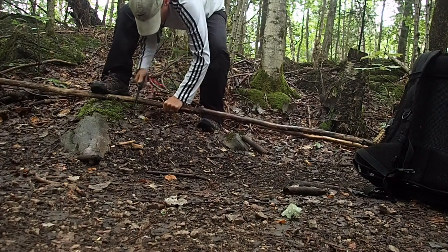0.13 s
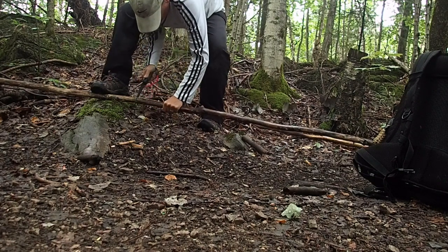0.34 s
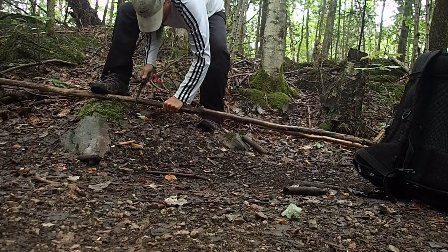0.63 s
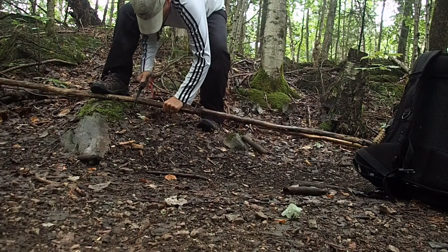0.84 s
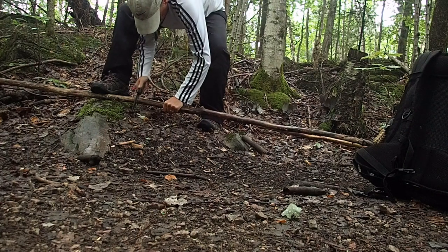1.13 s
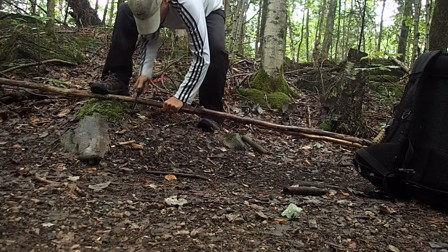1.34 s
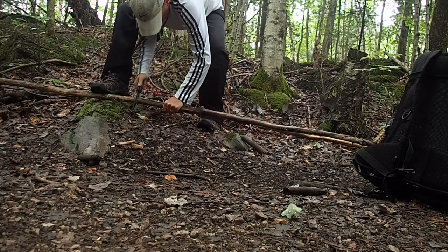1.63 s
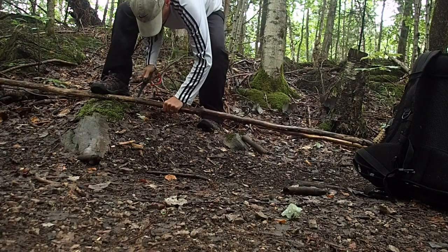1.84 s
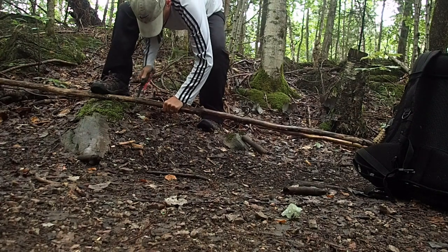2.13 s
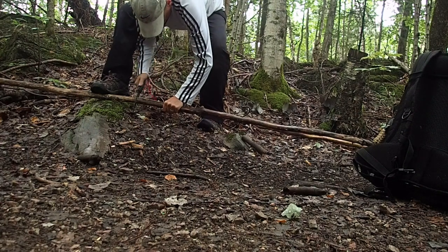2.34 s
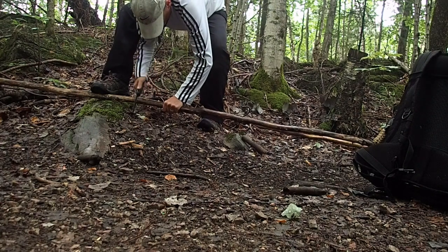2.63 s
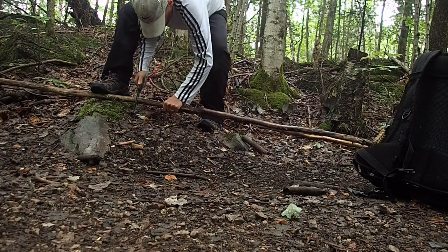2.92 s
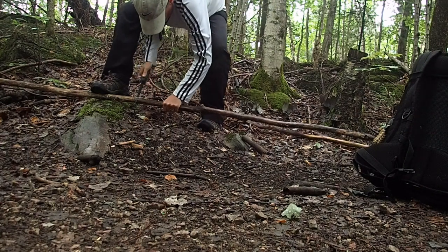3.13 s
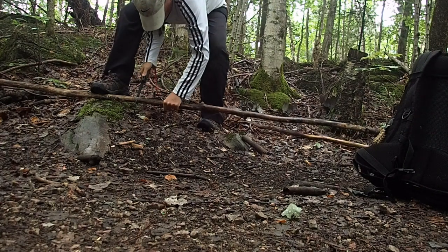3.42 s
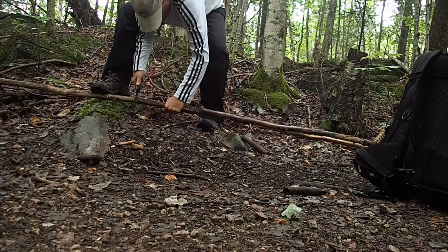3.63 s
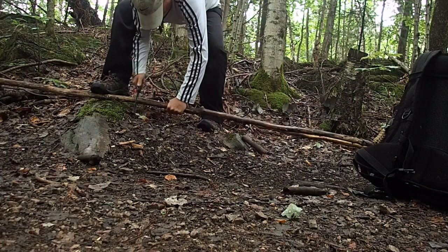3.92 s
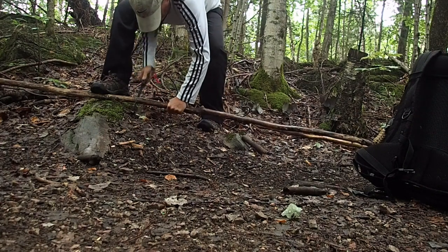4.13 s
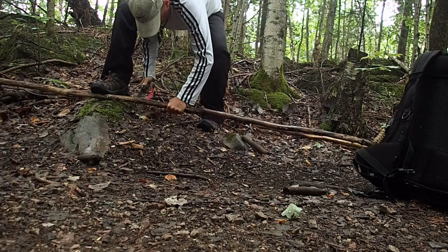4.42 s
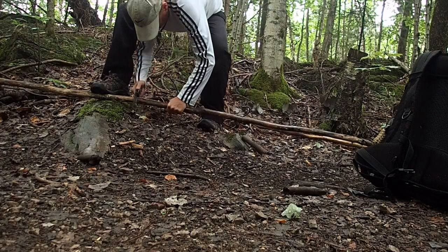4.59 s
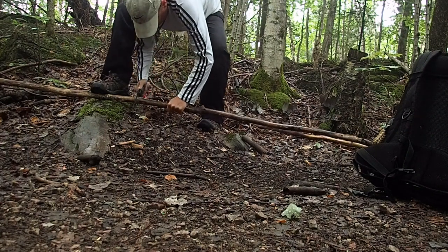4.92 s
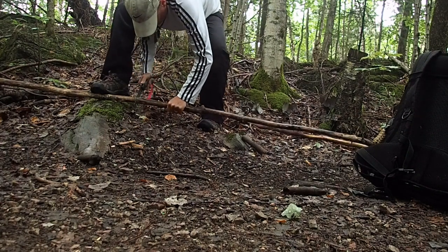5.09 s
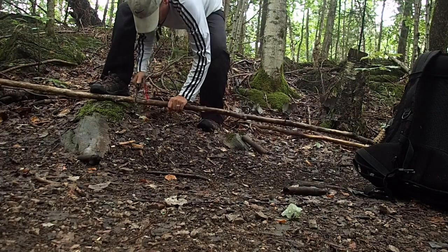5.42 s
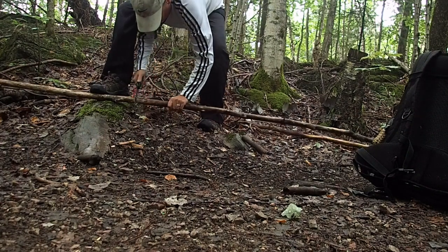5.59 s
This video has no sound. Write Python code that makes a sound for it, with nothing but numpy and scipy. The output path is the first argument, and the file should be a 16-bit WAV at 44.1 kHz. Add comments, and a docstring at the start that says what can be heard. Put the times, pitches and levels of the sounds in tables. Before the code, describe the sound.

A hand saw cuts through a branch close by on a forest floor, slightly to the right. From the start it moves back and forth at about six strokes a second, each a bright rasp over a hollow wooden boom. The blade squeaks thinly at about 0.2 seconds and snags on snapping splinters near 0.6 and 1.2 seconds. The wood groans briefly around 0.9 seconds and several times between 2.3 and 2.8. The saw rests from about 3.2 to 3.55 seconds, then resumes with sharper splinter snaps and a few dull knocks. Small cracks come at 4.3 and 4.9 seconds, and at 5.2 the branch breaks through with a loud, sharp crack and the sawing stops. A faint groan and small knock follow near 5.7 seconds. The trees return a short, light echo, over faint air and a steady high hiss.

```python
"""A hand saw works through a branch, close by on a forest floor, nearer the right of two microphones.
At about six strokes a second, with one rest, its teeth knock the branch and tear fibres.
The blade squeaks and snags on splinters; the wood groans, knocks and at last cracks right through.
The ground and the trunks scatter the sound back over faint air and a steady high background hiss."""
import sys
import numpy as np
from scipy import signal
from scipy.fft import rfft, irfft, next_fast_len
from scipy.io import wavfile
from scipy.ndimage import map_coordinates

SR = 44100
rng = np.random.default_rng(int(sys.argv[2]) if len(sys.argv) > 2 else 0)


def master(y):
    """Save y as 16-bit WAV."""
    cut = np.clip(np.atleast_2d(y).T, -1, 1)
    pcm = np.round(cut * 32767)  # scale
    wavfile.write(sys.argv[1], SR, pcm.astype(np.int16))


N = 253560
TIME = np.arange(N) / SR


def amp(db):
    """Decibels to gain."""
    return 10 ** (np.asarray(db) / 20)


def unit(x):
    """Scale to rms 1."""
    return x / np.sqrt(np.mean(x ** 2) + 1e-20)


def along(points, hz):
    """Read (f/Hz, value) points on a log axis."""
    f, v = np.transpose(points)
    return np.interp(np.log(hz + 1), np.log(f), v)


def filtered(x, response):
    """Multiply x by a complex response of frequency."""
    size = next_fast_len(N + SR // 2)
    return irfft(rfft(x, size) * response(np.fft.rfftfreq(size, 1 / SR)), size)[..., :N]


def ring(x, colour, size=4096):
    """Pass x through a causal body of the given colour and unit energy."""
    cepstrum = irfft(np.log(amp(along(colour, np.fft.rfftfreq(size, 1 / SR))) + 1e-6))
    cepstrum[1:size // 2] *= 2  # fold to minimum phase
    cepstrum[size // 2 + 1:] = 0
    response = irfft(np.exp(rfft(cepstrum)))
    return signal.fftconvolve(x, response / np.linalg.norm(response))[:N]


def wobble(rate):
    """A smooth random curve with rate knots a second."""
    return map_coordinates(rng.standard_normal(int(N * rate / SR) + 4), [TIME * rate])


def sliding(x, colour, shift, rate=12):
    """A body whose resonances drift up and down by the share shift as the teeth move through the cut."""
    low, high = (ring(x, [(hz * (1 + side * shift), db) for hz, db in colour]) for side in (-1, 1))
    place = (1 + np.tanh(2 * wobble(rate))) / 2
    return (1 - place) * low + place * high


def fibres(rate, spread_db):
    """Tiny random fractures of uneven size, about rate a second, rms 1."""
    clicks = (rng.random(N) < rate / SR) * rng.choice([-1, 1], N)
    return unit(clicks * amp(spread_db * rng.standard_normal(N)))


def blow(start, t60, attack):
    """An envelope that rises at start and dies away; times in seconds."""
    first, last = np.searchsorted(TIME, [start, start + 2 * t60])
    age, envelope = TIME[first:last] - start, np.zeros(N)
    envelope[first:last] = (1 - np.exp(-age / attack)) * amp(-60 * age / t60)
    return envelope


def slip(start, length, first_hz, last_hz, db, overtone):
    """A brief gliding friction tone that swells and fades."""
    span, tone = (TIME > start) & (TIME < start + length), np.zeros(N)
    age = TIME[span] - start
    phase = 2 * np.pi * (first_hz * age + (last_hz - first_hz) * age ** 2 / (2 * length) + rng.random())
    tone[span] = amp(db) * np.sin(np.pi * age / length) * (np.sin(phase) + overtone * np.sin(2 * phase))
    return tone


# how alike the background is at the two microphones: f/Hz, correlation
COHERENCE = [(60, 0.4), (180, 0.12), (550, 0.17), (1650, 0.3), (4970, 0.5), (15000, 0.03)]
def hush(colour, db, sway_db, pan_db):
    """A steady, gently swaying rush in both microphones."""
    def mid_and_side(hz):
        turn = np.arccos(along(COHERENCE, hz)) / 2
        return amp(along(colour, hz)) * [np.cos(turn), np.sin(turn)]
    mid, side = filtered(rng.standard_normal((2, N)), mid_and_side)
    level = amp(db + sway_db * wobble(9)) * amp([[pan_db / 2], [-pan_db / 2]])
    return unit(np.array([mid + side, mid - side])) * level


# spectra of the forest air and of the background hiss: f/Hz, relative level/dB
AIR_COLOUR = [(15, -47), (25, -21.5), (149, -4.5), (176, -4), (205, -9.5), (300, -1.5), (412, -7),
              (459, -7.5), (489, -8), (672, -6.5), (732, -4.5), (1470, -11), (1820, -18), (1980, -15),
              (4000, -22.5), (5200, -58), (8800, -120)]
HISS_COLOUR = [(2240, -43), (3800, -33), (4130, -8.5), (4550, -1), (5420, 6.5), (6000, -0.5), (8010, 3.5),
               (9200, -4), (12700, -5), (14600, -6), (16000, -4)]
def air_and_hiss():
    """The bed: a low rush of air and a steady high background hiss, a little to the right."""
    air = hush(AIR_COLOUR, db=-54, sway_db=1.4, pan_db=-3)
    hiss = hush(HISS_COLOUR, db=-52, sway_db=0.6, pan_db=-2.5)
    return air + hiss


# push and pull in turn: start t/s, fastest t/s, end t/s, force level/dB, early drag re force/dB
SAW_STROKES = [(.115, .134, 0.26, -41, -27), (.246, 0.331, .39, -33, -16.5), (.402, .471, 0.55, -31.5, -10),
               (.551, .631, .7, -33, -5.5), (.71, .764, .82, -34.5, -14), (.873, .932, .99, -32, -16),
               (1.008, 1.073, 1.127, -34, -8.5), (1.091, 1.131, 1.176, -38, -12),
               (1.169, 1.247, 1.332, -34.5, 1), (1.322, 1.399, 1.429, -32, -7.5),
               (1.438, 1.537, 1.59, -33.5, -11.5), (1.599, 1.661, 1.749, -32, -21),
               (1.737, 1.833, 1.89, -33, -37), (1.914, 1.967, 2.076, -34, -20),
               (2.065, 2.176, 2.223, -33, -6), (2.245, 2.314, 2.368, -32, -16),
               (2.407, 2.479, 2.52, -33, -11.5), (2.574, 2.631, 2.706, -33, -9),
               (2.717, 2.813, 2.853, -32.5, -9.5), (2.9, 2.95, 3.045, -36, -29),
               (3.024, 3.127, 3.192, -35, -30), (3.556, 3.631, 3.7, -33, -17),
               (3.689, 3.805, 3.872, -33.5, -10), (3.883, 3.958, 3.99, -35, -9),
               (3.992, 4.097, 4.147, -32, -19), (4.165, 4.245, 4.285, -33, -10.5),
               (4.308, 4.408, 4.43, -34.5, -36), (4.564, 4.633, 4.67, -36.5, -5),
               (4.703, 4.778, 4.845, -31.5, -18), (4.847, 4.895, 4.93, -40, -22),
               (5, 5.076, 5.16, -33.5, -18)]
def arm(branch_power, wood_power, rasp_power, full_speed_hz=299.7, pace_spread=.18, catch_s=.011):
    """The arm's force and the blade's speed set the tooth rate and the drive of three saw layers."""
    tooth_hz, drive = np.zeros(N), np.zeros((3, N))
    powers = np.array([[branch_power], [wood_power], [rasp_power]])
    for start, fastest, end, force_db, drag_db in SAW_STROKES:
        span = (TIME > start) & (TIME < end)
        t = TIME[span]
        speed = np.abs(np.sin(np.pi * np.interp(t, [start, fastest, end], [0, .5, 1])))
        # the teeth catch at once and drag while the arm gathers speed
        caught = np.clip((t - start) / catch_s, 0, 1) * (t < fastest)
        drag = (amp(drag_db) * caught) ** (powers / wood_power)
        peak_hz = full_speed_hz * (1 + pace_spread * rng.uniform(-1, 1))
        tooth_hz[span] = np.maximum(tooth_hz[span], peak_hz * speed ** .4)
        drive[:, span] += amp(force_db) * (drag + (1 - drag) * speed ** powers)
    return tooth_hz, drive


# spectra of the booming branch, the wood at the cut and the blade's rasp: f/Hz, relative level/dB
BRANCH_COLOUR = [(32, -70), (55, -21), (108, -10), (167, -10), (260, -1.5), (352, 2), (456, -7.5),
                 (500, -18), (650, -39), (1100, -120)]
WOOD_COLOUR = [(260, -48.5), (450, -21), (555, -4), (711, 1), (970, -1.5), (1310, -8), (1500, -17.5),
               (1660, -7), (1860, -31), (2070, -16.5), (2530, -27.5), (3040, -15), (3330, -25), (3680, -19),
               (4000, -45), (5200, -50), (8800, -120)]
RASP_COLOUR = [(2240, -29), (3800, -17), (4060, -18), (4500, -4), (4830, -8), (6190, 0.5), (6890, -4),
               (7870, 1), (8510, -3.5), (9370, -10.5), (11100, -13.5), (15200, -14), (16000, -14)]
# the branch booms more as the cut deepens: t/s, relative level/dB
BRANCH_BOOM = [(.3, -8), (1.3, -5.5), (2.35, -3), (3.1, -3.5), (3.85, -5.5), (4.7, -1.5), (5.1, -3.5)]
def saw(jitter=.09, tooth_share=0.4, bite=0.28, grab_db=0.91, catch_db=2.0):
    """Close to the microphones, each tooth shoves the branch and tears a clump of fibres."""
    tooth_hz, (branch, wood, rasp) = arm(branch_power=3.13, wood_power=3.33, rasp_power=2.72)
    teeth_passed = np.cumsum(tooth_hz * (1 + jitter * wobble(170))) / SR
    teeth = unit(np.diff(np.floor(teeth_passed), prepend=0) * amp(3.7 * rng.standard_normal(N)))
    tearing = unit(1 + bite * np.cos(2 * np.pi * teeth_passed))
    grab = amp(grab_db * wobble(90))  # the teeth grip unevenly along the grain
    shove = tooth_share * teeth + (1 - tooth_share) * fibres(1500, spread_db=2.5)
    chips = 0.24 * teeth + tearing * fibres(3000, spread_db=2.5)
    dust = tearing * fibres(12000, spread_db=3.5) * amp(catch_db * wobble(130))
    boom = amp(np.interp(TIME, *np.transpose(BRANCH_BOOM)))
    return (ring(grab * branch * boom * shove * amp(-2), BRANCH_COLOUR)
            + sliding(grab * wood * chips * amp(-2.5), WOOD_COLOUR, shift=0.014)
            + sliding(grab * rasp * dust * amp(-3.3), RASP_COLOUR, shift=0.02))


# the blade snags: t/s, length/s, force level/dB, knock re force/dB
BLADE_SNAGS = [(.1345, .005, -24, -11), (.1815, .005, -26, -19), (0.576, .005, -19, -7),
               (1.0291, .005, -28, -7), (1.176, .005, -22, -14), (1.1856, .005, -19, -11),
               (1.193, .005, -15.5, -11), (1.5146, .005, -22.5, -5), (1.937, .025, -27, -9),
               (3.5639, .005, -36, 3), (3.598, .005, -27, 13), (3.6313, .005, -11.5, -16),
               (3.731, .005, -12.5, -17), (3.7507, .032, -14, -20), (3.952, .005, -20.5, -1),
               (3.9934, .005, -23.5, -18), (4.2956, .005, -26, -25), (4.5, .005, -26, -22),
               (4.5143, .005, -21, -7), (4.6277, .005, -19, -8), (4.6345, .005, -20, -10),
               (4.6398, .005, -14.5, -3), (4.732, .005, -26, -5), (4.7593, .015, -12, -15),
               (4.782, .015, -13.5, -17), (4.9576, .005, -27, -28)]
def splinters(gap_s=0.00935, stray_db=2, spread_db=2.5, stray_knock_db=-9):
    """Rows (t/s, level/dB, knock/dB): a run at each snag, and a stray as each stroke gathers speed."""
    rows = [(at, db, knock_db) for start, length, db, knock_db in BLADE_SNAGS
            for at in np.arange(start, start + length, gap_s)]
    delays, sizes = rng.random(len(SAW_STROKES)), rng.standard_normal(len(SAW_STROKES))
    for (start, fastest, _, force_db, _), delay, size in zip(SAW_STROKES, delays, sizes):
        at = start + delay * (fastest - start)
        rows.append((at, force_db + stray_db + spread_db * size, stray_knock_db))
    return rows


# spectrum of a snapping splinter: f/Hz, relative level/dB
SPLINTER_COLOUR = [(1500, -15), (3000, -15.5), (4000, -13), (5100, -8.5), (6300, 5.5), (7100, -3),
                   (8000, 4.5), (10000, -12), (15500, -21)]
def snags(snap_db=-7, knock_db=-11):
    """Splinters snap in a quick run of fractures that also knocks the wood."""
    snap, knock = np.zeros((2, N))
    for start, db, wood_db in splinters():
        force = amp(db) * blow(start, t60=.025, attack=0.00085)
        snap += force
        knock += force * amp(wood_db)
    return (ring(amp(snap_db) * snap * fibres(18000, spread_db=1), SPLINTER_COLOUR)
            + ring(amp(knock_db) * knock * fibres(8000, spread_db=2), WOOD_COLOUR))


# squeaks of the blade: t/s, length/s, f/Hz, level/dB
BLADE_SQUEAKS = [(.215, 0.009, 4370, -45), (.23, 0.011, 4440, -44), (.23, 0.0097, 11400, -42),
                 (.23, .012, 14879, -51), (2.396, .016, 9085, -48)]
def squeaks():
    """The steel rubs in the kerf with thin, pure tones."""
    return sum(slip(start, length, hz, hz, db, overtone=0) for start, length, hz, db in BLADE_SQUEAKS)


# the branch gives way, at last right through: t/s, level/dB, bright snap re level/dB
BRANCH_CRACKS = [(0.85, -39, -10), (4.2644, -28.5, 9), (4.9271, -23, 6.5), (5.1906, -11, 1),
                 (5.221, -26, -3)]
# modes of the breaking branch: f/Hz, relative level/dB, t60/s
FRACTURE_MODES = [(900.6, -12, 0.017), (1306, -10.5, 0.017), (2253, -16.5, 0.013), (3009, -9, 0.017),
                  (3724, -15, 0.017), (4480, -6.5, 0.011), (5100, 0.5, 0.014), (6150, 1, 0.011),
                  (7193, -6, 0.013), (8190, 6.5, 0.0074), (8900, 0.5, 0.0052), (10240, -9, .008),
                  (12500, -5, .007), (14800, -4, .005)]
def cracks(tear_db=-6, rustle_db=-30):
    """Fibres give way at once: a bright snap, a short ring, a little tearing and a splintery rustle."""
    ringing, snap, tear = np.zeros((3, N))
    t = np.arange(SR // 20) / SR
    onset = 1 - np.exp(-t / 0.00023)
    for start, db, bright_db in BRANCH_CRACKS:
        modes = sum(amp(level - 60 * t / t60) * np.sin(2 * np.pi * (hz * t + rng.random()))
                    for hz, level, t60 in FRACTURE_MODES)
        ringing[round(start * SR):][:len(t)] += amp(db - 0.7) * modes * onset
        snap += amp(db + bright_db) * blow(start, t60=0.009, attack=0.00038)
        tear += amp(db + tear_db) * blow(start, t60=0.018, attack=0.00081)
        tear += amp(db + rustle_db) * blow(start, t60=0.41, attack=.02)
    bright = ring(snap * rng.standard_normal(N), [(3000, -15), (8000, 5), (11000, -0.5), (15500, -1.5)])
    return ringing + bright + ring(tear * fibres(12000, spread_db=0), SPLINTER_COLOUR)


# groans of the branch: t/s, length/s, first f/Hz, last f/Hz, level/dB
BRANCH_GROANS = [(.905, .051, 328, 259, -35.5), (2.288, .063, 240.1, 261, -35.5),
                 (2.45, 0.052, 272.5, 278, -35.5), (2.608, .04, 225, 275, -34.5),
                 (2.635, .041, 315, 354, -30.5), (2.781, 0.061, 284.5, 306.6, -37),
                 (4.742, 0.039, 297, 299.4, -36), (5.658, .027, 453, 312, -40.5)]
def groans():
    """Stick and slip in the cut makes the wood groan."""
    return sum(slip(*row, overtone=0.22) for row in BRANCH_GROANS)


# the branch knocks in the cut: t/s, relative level/dB, f/Hz, t60/s
BRANCH_KNOCKS = [(3.636, -30.5, 1155, 0.042), (3.956, -33.5, 1201, 0.051), (4.265, -32.5, 1060, 0.023),
                 (5.229, -42, 260.1, .08), (5.7267, -33, 1070, 0.016), (5.733, -48, 294, 0.058)]
def knocks(rattle_db=-4):
    """Each dull knock is one damped resonance and a dry rattle of the wood."""
    tone, force = np.zeros((2, N))
    for start, db, hz, t60 in BRANCH_KNOCKS:
        hit = 2 * amp(db) * blow(start, t60, attack=0.001)
        tone += hit * np.sin(2 * np.pi * hz * (TIME - start))
        force += hit
    return tone + ring(amp(rattle_db) * force * fibres(4600, spread_db=5.0), WOOD_COLOUR)


# left microphone minus right: f/Hz, level/dB
LEFT_LEVEL = [(60, 0), (110, -11), (200, -14.5), (380, -8.5), (700, -2), (1290, -4.5), (2380, -4),
              (4400, -3.5), (8120, -6), (15000, 0.5)]
# left microphone ahead of right: f/Hz, phase/rad
LEFT_LEAD = [(0, 0), (430, 1.32), (690, -0.48), (1380, 0.53), (1640, 0.035), (4310, 0.44), (5000, 0.63),
             (6980, 0.81), (8270, 0.63), (8870, 1.02), (10900, 1.46), (12700, 1.3), (14700, 1.5),
             (16600, 0.1)]
def direct(x):
    """The straight path from the cut reaches each microphone with its own level and phase."""
    side = np.array([[.5], [-.5]])
    gain = lambda hz: amp(side * along(LEFT_LEVEL, hz))
    return filtered(x, lambda hz: gain(hz) * np.exp(1j * side * along(LEFT_LEAD, hz)))


def scattered(x, paths, colour):
    """Send x along left and right echo paths and colour it, 4 dB stronger on the right."""
    paths = paths / np.linalg.norm(paths, axis=1, keepdims=True)
    wet = signal.fftconvolve(x[None], paths, axes=1)[:, :N]
    return filtered(wet, lambda hz: amp(along(colour, hz))) * amp([[-2], [2]])


def ground(x, db=-13, t60=0.052):
    """Leaf litter and stones close by scatter the treble to each microphone by its own paths."""
    t = np.arange(SR // 20) / SR
    paths = rng.standard_normal((2, len(t))) * amp(-60 * t / t60) * (t > .001)
    return amp(db) * scattered(x, paths, [(500, -14.0), (2000, 4), (14000, -2)])


# decay among the trees: f/Hz, t60/s
FOREST_DECAY = [(150, 0.47), (1000, 0.48), (3000, 0.65), (6000, 0.66), (14000, 0.44)]
# what the trunks send back: f/Hz, level/dB
TRUNK_ECHO = [(150, -10.5), (800, -18), (3000, -8.5), (5500, -9.5), (9000, -15.5), (15000, -12)]
def forest(x, echoes_per_s=900, diffuse=0.53):
    """Echoes from trunks further off merge into a fading tail, different on each side."""
    echoes = rng.standard_normal((2, SR)) * (diffuse + 4 * (rng.random((2, SR)) < echoes_per_s / SR))
    echoes += 0.33 * echoes[::-1]  # each microphone hears some of the other side
    hz, t, spectrum = signal.stft(echoes, SR, nperseg=256)
    decay = amp(-60 * t / along(FOREST_DECAY, hz)[:, None])
    tail = signal.istft(spectrum * decay, SR, nperseg=256)[1]
    tail *= 1 - np.exp(-np.arange(tail.shape[1]) / SR / 0.0019)
    return scattered(x, tail, TRUNK_ECHO)


def scene(crack_echo_db=3):
    """The sawing is nearer the right microphone; the forest surrounds it."""
    sawing = saw() + snags() + knocks() + groans() + squeaks()
    breaking = cracks()
    work = sawing + breaking
    # the break radiates from the whole branch and carries further among the trees
    echo = forest(sawing) + amp(crack_echo_db) * forest(breaking)
    return air_and_hiss() + direct(work) + ground(work) + echo


def record(dry, ceiling=.9, top_hz=15900):
    """The recorder clips any peak over its ceiling and keeps nothing above its band limit."""
    return filtered(np.clip(dry, -ceiling, ceiling), lambda hz: hz < top_hz)


dry = scene()
out = record(dry)
master(out)
```